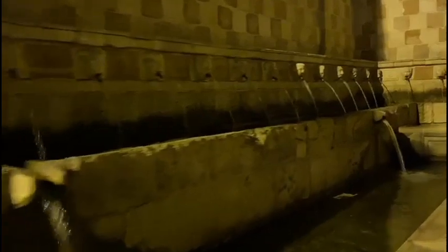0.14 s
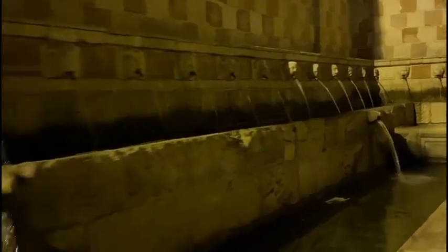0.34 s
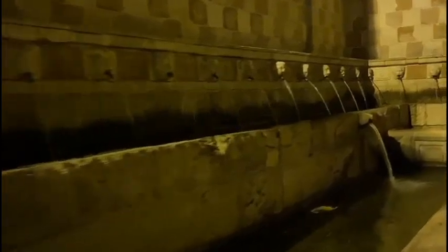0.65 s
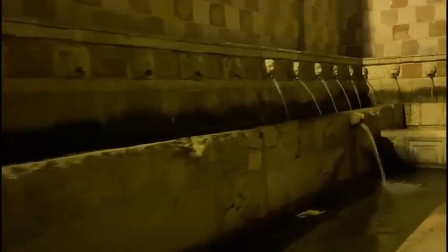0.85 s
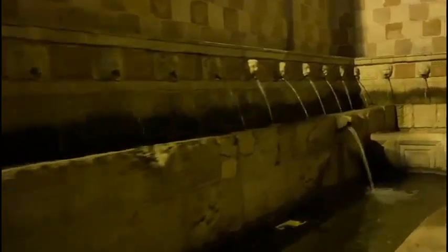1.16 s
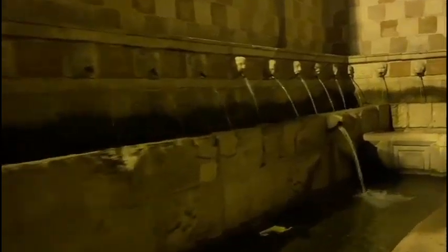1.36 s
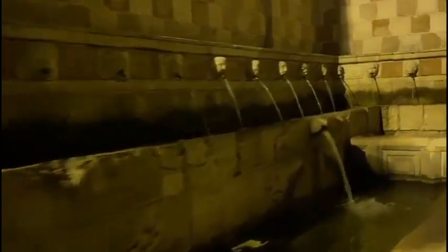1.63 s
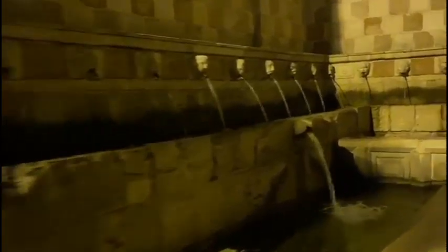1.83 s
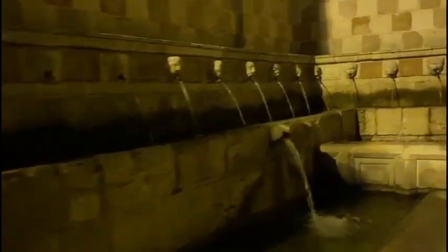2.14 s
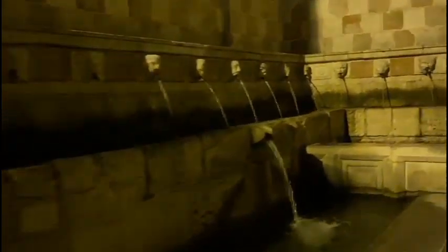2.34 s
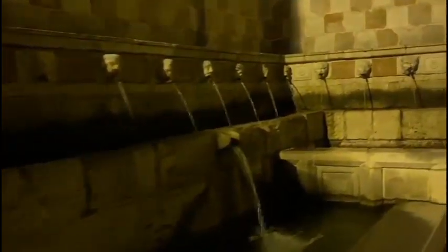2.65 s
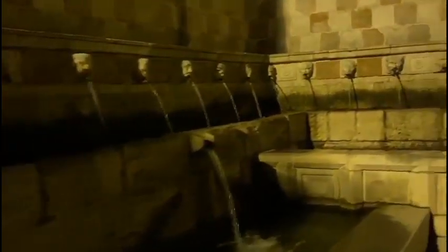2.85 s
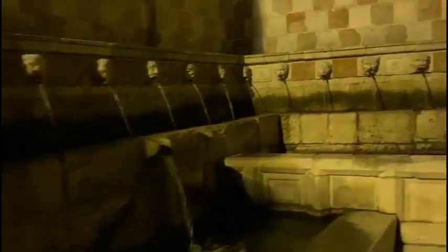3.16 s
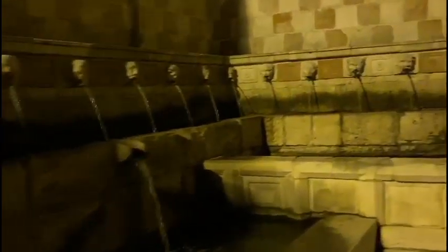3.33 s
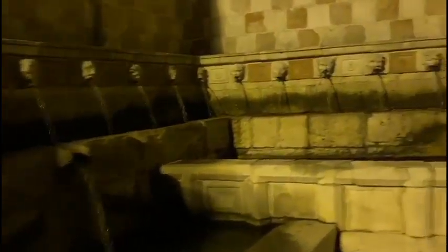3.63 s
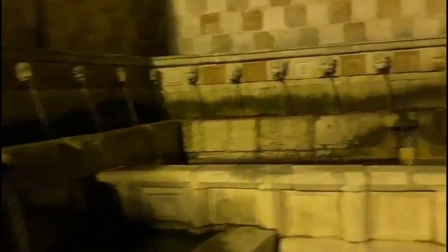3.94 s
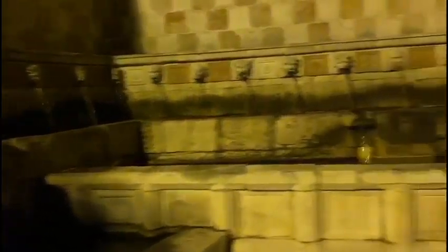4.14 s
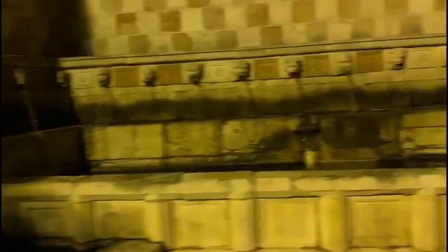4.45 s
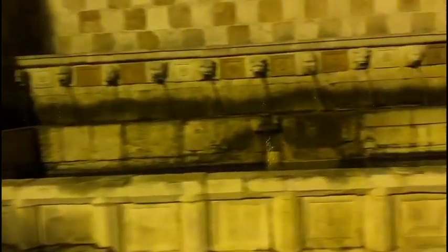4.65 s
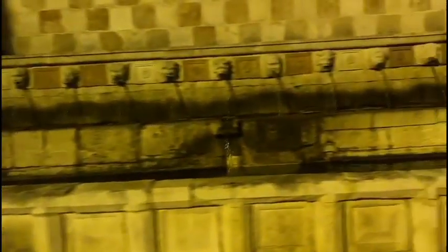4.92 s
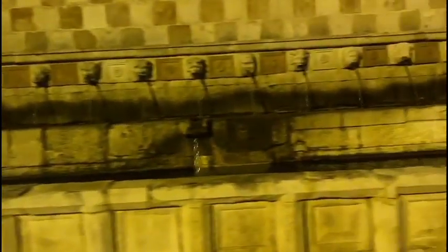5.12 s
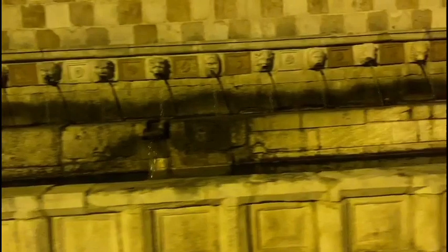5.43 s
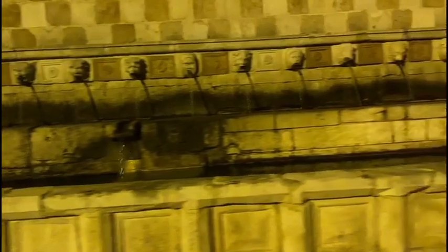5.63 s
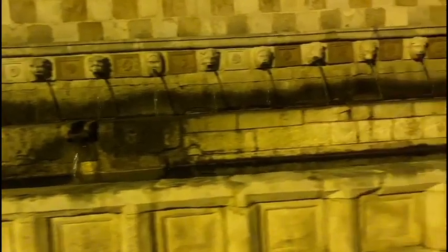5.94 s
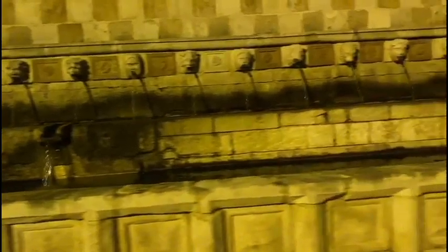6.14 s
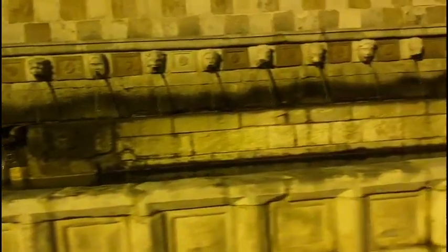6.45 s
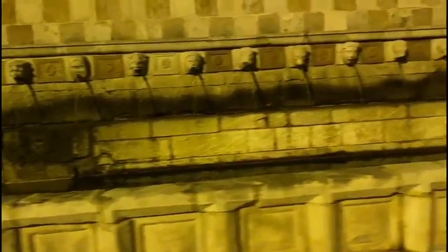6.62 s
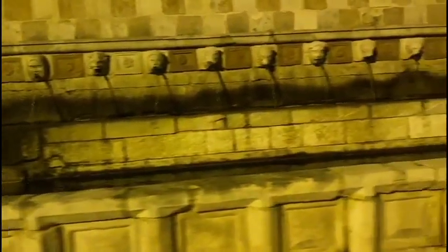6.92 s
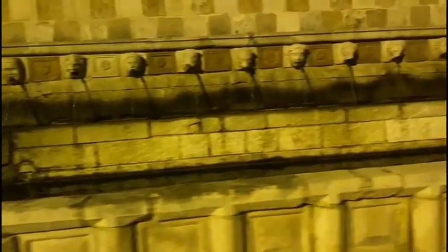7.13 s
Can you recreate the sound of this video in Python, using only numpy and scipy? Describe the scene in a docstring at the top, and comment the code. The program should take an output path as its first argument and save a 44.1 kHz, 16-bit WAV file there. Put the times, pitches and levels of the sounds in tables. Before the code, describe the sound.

Water splashes and gurgles from a row of spouts in a walled corner, with soft wind thumps and a faint distant town hum.

```python
"""A bright wash of water, as a row of spouts pours into a fountain's stone troughs in a walled corner.
Tiny drops merge into hiss, trapped bubbles ring, and now and then a lump of water lands with a splat.
The walls echo the drops, and a town murmurs far away. A light wind rumbles and thumps on the
microphone, then dies down; the stereo image shifts as it turns from the near jets to the far wall."""
import sys
import numpy as np
from scipy import signal
from scipy.fft import rfft, irfft
from scipy.io import wavfile
from scipy.ndimage import uniform_filter1d

SR = 44100
rng = np.random.default_rng(int(sys.argv[2]) if len(sys.argv) > 2 else 0)


def unload_audio(sound):
    """Save the sound as a 16-bit wav file, at the path given as the first command line argument."""
    columns = np.transpose(np.atleast_2d(sound))
    # keep every value between -1 and 1, then stretch to whole-number steps
    steps = np.round(np.clip(columns, -1, 1) * 32767)
    wavfile.write(sys.argv[1], SR, steps.astype(np.int16))


N = 321048

# Fader rides on the water, each taken relative to its own average: time_s, splash_db, spray_db
WATER_RIDES = [(0, -38, -41), (0.85, -37, -40.5), (1.45, -38.5, -41), (2.2, -38, -42), (3.05, -38, -41.5),
               (3.9, -39.5, -42.5), (4.4, -39, -41.5), (5.6, -40.5, -43.5), (7.28, -41, -43.5)]
# EQ of the falling water: frequency_hz, gain_db
WATER_EQ = [(100, -15), (250, -3), (400, -7), (570, -6), (760, -5), (1000, -5), (1400, -5), (1750, -7),
            (2800, -9.5), (3400, -10.5), (4400, -15), (5200, -17), (6700, -20), (7600, -20), (8400, -20),
            (10500, -20), (11500, -22.5)]
# Gurgle of two single jets as the microphone passes, before the EQ: time_s, shallow_db, deep_db
JET_RIDES = [(0, -19, -12.5), (.9, -11, -16), (1.7, -12, -19), (2.4, -23, -16.5), (3.6, -18, -13),
             (4.6, -16, -17), (5.8, -17, -20.5), (7.28, -15, -29)]
# Reverb time of the stone corner: frequency_hz, t60_s
WALL_DECAY = [(200, 0.47), (1500, 0.77), (5000, 1), (11000, 0.066)]
# Stereo image facing along the spouts: frequency_hz, likeness (0-1), left_lead_rad
IMAGE_SPOUTS = [(150, 0.83, -0.34), (300, 0.62, 0.08), (450, 0.45, 1.24), (700, 0.36, 2.13),
                (1400, 0.28, 3.05), (1650, 0.12, 4.65), (2000, 0.44, 6.11), (2400, 0.67, 6.44),
                (2900, 0.54, 7.06), (3500, 0.31, 7.49), (3950, 0.16, 7.12), (4800, 0.55, 6.8),
                (5450, 0.55, 6.58), (5850, 0.17, 5.57), (6500, 0.76, 6.21), (7200, 0.69, 6.11),
                (7600, 0.23, 5.01), (8050, 0.95, 3.11), (8400, 0.99, 3.14), (8700, 0.96, 3.07),
                (9200, 0.69, 2.44), (9650, 0.54, 1.26), (10100, 0.9, 0.1), (10400, 1, 0)]
# Stereo image facing the far wall: frequency_hz, likeness (0-1), left_lead_rad
IMAGE_WALL = [(150, 0.78, -0.09), (300, 0.46, 0.09), (450, 0.27, 1.64), (700, 0.33, 2.46), (900, 0.55, 2.7),
              (1330, 0.62, 3.1), (1650, 0.3, 3.61), (2000, 0.19, 5.56), (2400, 0.52, 6.38),
              (2900, 0.51, 6.88), (3500, 0.29, 7.59), (3950, 0.2, 7.79), (4800, 0.44, 6.65),
              (5450, 0.53, 6.59), (5850, 0.09, 4.04), (6500, 0.71, 6.21), (7200, 0.74, 6.14),
              (7600, 0.17, 4.81), (8050, 0.95, 3.11), (8400, 0.99, 3.14), (8700, 0.96, 3.05),
              (9200, 0.68, 2.34), (9650, 0.53, 1.25), (10100, 0.87, 0.2), (10400, 1, 0)]
# The microphone's turn toward the wall: time_s, share_turned (0-1)
MIC_TURN = [(4.1, 0.046), (5.7, 1)]
# Balance of the water: frequency_hz, left_over_right_db
BALANCE = [(150, 0), (350, .7), (620, 2.8), (1200, 2), (2600, 2.2), (3800, 3.5), (5800, 2.7), (6600, .5),
           (7700, 1.2), (8200, 0)]
# EQ of the distant town: frequency_hz, gain_db
TOWN_EQ = [(20, -32), (60, -26), (110, -4.5), (160, 1.5), (210, -6), (330, -14), (450, -13), (1000, -62),
           (4000, -70)]
# EQ of the wind rumble: frequency_hz, gain_db
WIND_EQ = [(15, -29), (30, -20), (50, -1), (65, 1.5), (100, -3), (160, -10.5), (260, -23.5), (600, -70),
           (2000, -90)]
# The breeze between gusts, with two lulls: time_s, level_db
BREEZE_RIDE = [(0, -34.5), (.66, -37.5), (1.15, -33), (2.8, -32.5), (2.95, -45.5), (3.15, -35.5),
               (4.1, -38), (5.8, -44.5), (6.15, -58), (6.65, -42.5), (7.28, -47)]
# Gusts brushing the microphone: start_s, length_s, level_db
GUST_CUES = [(0.213, 0.1, -29.5), (0.371, 0.056, -29), (0.468, 0.13, -29.5), (0.705, 0.086, -31.5),
             (0.86, 0.074, -30.5), (0.944, 0.054, -25), (1.03, 0.05, -21), (1.233, 0.05, -31.5),
             (1.646, 0.26, -29.5), (1.957, 0.15, -36), (2.094, 0.39, -33), (2.482, 0.11, -32),
             (3.043, 0.16, -35), (3.47, 0.23, -33), (3.737, 0.13, -33), (3.98, 0.16, -29),
             (4.192, 0.16, -37.5), (4.546, 0.13, -31.5), (4.771, 0.13, -34), (5.184, 0.11, -34),
             (5.834, 0.15, -39), (6.483, 0.052, -40)]
# Lumps of water slapping the surface: start_s, relative_level_db, centre_hz, width_octaves, attack_s
SPLAT_CUES = [(.059, 4, 4000, .3, .0014), (.107, 12.5, 2750, .2, .0017), (.196, 8, 3100, .45, .0012),
              (0.243, 11, 6500, .35, .002), (0.405, 12.5, 6500, 0.33, .0014), (.707, 8, 10800, .2, .002),
              (0.791, 11, 10400, .2, .0018), (.800, 13, 10400, .2, 0.0026), (0.802, 14, 4200, 0.21, .002),
              (.925, 8, 4500, .2, .005), (0.967, 7, 4600, 0.18, 0.0049), (.986, 15, 4770, .1, 0.0027),
              (1.278, 8, 10000, .3, .002), (1.346, 12.5, 10500, .2, .0023), (1.76, 15, 9100, 0.41, .0017),
              (2.21, 11, 4650, .15, .0022), (2.481, 8, 2700, .4, 0.0019), (2.493, 9, 3000, 0.78, 0.0012),
              (2.558, 9, 10500, .2, .001), (2.567, 7, 6500, .25, .0015), (2.755, 9.5, 3400, 1, .0022),
              (2.78, 9, 3950, .12, .002), (3.259, 9, 10000, .2, .0015), (3.751, 15, 5800, 0.17, .0012),
              (4.022, 11, 6000, 0.33, .0013), (4.192, 6, 3000, .35, .0014), (4.22, 4, 3200, .35, 0.0013),
              (4.4485, 12, 10400, .2, .0011), (4.666, 13, 10400, .25, .0008),
              (4.667, 8, 2100, 0.37, 0.0015), (5.499, 10.5, 2400, 0.5, .0017),
              (5.608, 11, 5500, .15, .0016), (5.719, 12, 10300, .2, .0013), (5.843, 12, 6500, .3, .001),
              (6.144, 13, 2400, .25, .0014), (6.199, 7, 10400, .2, .0012), (6.2485, 13, 8000, .45, .0012),
              (7.0612, 16, 9200, 0.4, .0007), (7.181, 8, 6000, .25, .0016)]
# Single eddies thumping the microphone: start_s, relative_peak_db, decay_s
BUFFET_CUES = [(0.243, -25, 0.0055), (0.263, -25, 0.0022), (0.495, -22.5, .0035), (0.558, -25, 0.0017),
               (0.712, -22, 0.0022), (0.854, -27, 0.0038), (.95, -17, 0.0012), (1.023, -19.5, 0.0045),
               (1.063, -21, 0.0021), (1.276, -29, .0018), (1.794, -18, 0.00097), (1.861, -24, 0.0016),
               (2.111, -13.5, 0.0026), (2.187, -25, 0.0044), (2.229, -20, 0.0027), (2.261, -24, 0.002),
               (2.29, -20, 0.0021), (2.342, -16, 0.0032), (2.418, -16.5, 0.0015), (2.506, -23, 0.0017),
               (2.556, -21.5, 0.0017), (2.728, -21, 0.0038), (3.297, -22.5, 0.0015), (3.478, -22.5, 0.0046),
               (3.623, -20, 0.0012), (3.982, -21.5, 0.0015), (4.007, -27, 0.0032), (4.807, -29, 0.0032),
               (5.198, -26, 0.0015)]
# Single large bubbles: start_s, relative_level_db, pitch_hz, decay_s
PLINK_CUES = [(.409, 2.5, 984, 0.0078), (.472, -2, 2420, .006), (.882, -1, 860, 0.014),
              (1.566, 3, 885, 0.0098), (1.642, 2, 2970, .005), (1.7455, 7, 1120, 0.005),
              (2.254, 2, 2826, .006), (2.491, 2, 1650, 0.0065), (2.756, 4, 1900, .007),
              (3.639, -2, 453, .008), (3.901, -5, 1660, 0.0069), (4.19, 0, 3020, .006),
              (4.215, 1, 2555, .006), (4.625, -1, 1040, .006), (4.667, 7, 2020, 0.0043),
              (5.5, 0, 2730, .007), (6.101, -16, 910, .012), (6.132, -13, 1180, 0.0053),
              (6.136, -2, 687, .012), (6.147, 2, 2219, 0.011), (6.502, 3, 960, 0.0088),
              (7.025, -6, 1380, .007)]


def amp(db):
    """Decibels to gain."""
    return 10 ** (np.asarray(db) / 20)


def unit_rms(x):
    """Scales to rms 1."""
    return x / np.sqrt(np.mean(x ** 2) + 1e-20)


def at_hz(rows, hz, column=1):
    """Reads a curve on a log-frequency axis."""
    columns = np.transpose(rows)
    return np.interp(np.log(hz + 1), np.log(columns[0] + 1), columns[column])


def at_time(rows, t, column=1):
    """Reads an automation curve, with straight ramps between its points."""
    columns = np.transpose(rows)
    return np.interp(t, columns[0], columns[column])


def bell(hz, centre_hz, octaves):
    """A bell-shaped band, 1 at its centre."""
    return np.exp(-.5 * (np.log2((hz + 1) / centre_hz) / octaves) ** 2)


def add(mix, start_s, sound):
    """Drops a sound into the mix."""
    part = mix[..., max(round(start_s * SR), 0):][..., :sound.shape[-1]]
    part += sound[..., :part.shape[-1]]


def spectra(x, size=512):
    """Short-time spectra: Hz, s, channels x bins x frames."""
    return signal.stft(x, SR, nperseg=size, noverlap=size - size // 4)


def waveform(z, size=512):
    """Short-time spectra back to sound."""
    return signal.istft(z, SR, nperseg=size, noverlap=size - size // 4)[1][..., :N]


def patches(z, width_hz, length_s):
    """Smooth random modulation over the bins and frames of z, rms 1."""
    bins, frames = shape = z.shape[1:]
    across = np.fft.fftfreq(bins, SR / 2 / bins)[:, None] * width_hz
    along = np.fft.rfftfreq(frames, N / SR / frames) * length_s
    smooth = np.exp(-across ** 2) / np.sqrt(1 + (np.pi * along) ** 2)
    return unit_rms(np.fft.irfft2(np.fft.rfft2(rng.standard_normal(shape)) * smooth, shape))


def noise_pair(eq):
    """Two unrelated noises through the same EQ."""
    colour = amp(at_hz(eq, np.fft.rfftfreq(N, 1 / SR)))
    return unit_rms(irfft(rfft(rng.standard_normal((2, N))) * colour, N))


def wash(patchy_db=1.5, surge_db=0.62, spray_db=1, churn_db=0.7):
    """Countless tiny drops merge into a hiss that surges as jets break up and churns where they plunge."""
    hz, _, z = spectra(rng.standard_normal((2, N)))
    patchy = patches(z, width_hz=650, length_s=0.036)
    surge = patches(z, width_hz=6200, length_s=0.015)
    treble = np.minimum(hz / 8000, 1)[:, None]
    mids = bell(hz, centre_hz=1300, octaves=0.91)[:, None]
    spray = patches(z, width_hz=8100, length_s=0.023) * treble  # fine spray comes in waves
    churn = patches(z, width_hz=150, length_s=0.013) * mids  # clouds of bubbles come and go
    flutter_db = patchy_db * patchy + surge_db * surge + spray_db * spray + churn_db * churn
    return unit_rms(waveform(z * amp(flutter_db)))


def bubble_ring(t, hz, age, rise):
    """Trapped air rings and dies, bending up as it nears the surface; age counts decay times."""
    return np.exp(-age) * np.sin(2 * np.pi * hz * t * (1 + rise * np.minimum(age, 2)))


def bubbles(count, low_hz, high_hz, cycles, rise, spread_db, size):
    """A swarm of bubbles, each ringing for a few cycles at its own time, pitch and place."""
    when, pitch, strength, damping, place = rng.random((count, 5)).T
    hz = (low_hz * (high_hz / low_hz) ** pitch)[:, None]
    t = np.arange(size) / SR
    age = hz * t / (cycles * (.5 + damping[:, None]))
    level_db = spread_db * np.minimum(-np.log(1 - strength), 4)
    rings = hz * amp(level_db)[:, None] * bubble_ring(t, hz, age, rise)
    samples = (when * N).astype(int)[:, None] + np.arange(size)
    pans = np.cos(2 * np.pi * place), np.sin(2 * np.pi * place)
    swarm = [np.bincount(samples.ravel(), (rings * pan[:, None]).ravel(), N)[:N] for pan in pans]
    return unit_rms(np.array(swarm))


def droplets(per_s=600, spread_db=3.5, low_cut_hz=4500):
    """Thrown drops tick on the water and the wet stone."""
    hits = rng.random((2, N)) < per_s / SR
    ticks = hits * amp(spread_db * np.minimum(rng.exponential(1, (2, N)), 4))
    low_cut = signal.butter(2, low_cut_hz, "highpass", fs=SR, output="sos")
    return unit_rms(signal.sosfilt(low_cut, ticks))


def wall_echo(x, count=1500):
    """The stone corner answers with sparse echoes; the top end dies first."""
    taps = np.zeros((2, SR))
    delays = rng.integers(SR // 200, SR, (2, count))
    np.put_along_axis(taps, delays, rng.choice([-1., 1.], (2, count)), 1)
    hz, t, z = spectra(taps)
    tail = waveform(z * np.exp(-np.log(1000) * t / at_hz(WALL_DECAY, hz)[:, None]))
    return signal.fftconvolve(x, tail / np.linalg.norm(tail[0]), axes=1)[:, :N]


def pouring():
    """The jets hit the troughs: a bed of wash, with bubbles and drops that echo off the walls."""
    t = np.arange(N) / SR
    fizz = bubbles(9000, low_hz=1219, high_hz=10420, cycles=4.8, rise=0.016, spread_db=-0.5, size=384)
    gurgle = bubbles(1100, low_hz=521.6, high_hz=2114, cycles=7.2, rise=0.03, spread_db=1.5, size=2048)
    shallow = bubbles(700, low_hz=759.4, high_hz=1120, cycles=9.2, rise=0.021, spread_db=-1.5, size=1536)
    deep = bubbles(400, low_hz=454, high_hz=673, cycles=8.6, rise=0.035, spread_db=2, size=2560)
    trickle = bubbles(700, low_hz=480, high_hz=2900, cycles=18, rise=0.015, spread_db=0.3, size=3584)
    jets = shallow * amp(at_time(JET_RIDES, t)) + deep * amp(at_time(JET_RIDES, t, column=2))
    swarms = amp(-8) * fizz + amp(-16) * gurgle + amp(-12) * trickle + jets
    detail = swarms + amp(-17) * droplets() + amp(2.5) * splats() + amp(0.5) * plinks()
    return amp(4.5) * wash() + detail + amp(-8.5) * wall_echo(detail)


def stereo_image(z, hz, t):
    """Two sound fields reach the microphone's two ports; likeness and lag change as it turns."""
    spouts, wall = (at_hz(image, hz) * np.exp(1j * at_hz(image, hz, column=2))
                    for image in (IMAGE_SPOUTS, IMAGE_WALL))
    turned = at_time(MIC_TURN, t)
    coherence = (1 - turned) * spouts[:, None] + turned * wall[:, None]
    likeness = np.minimum(abs(coherence), 1)
    mid, side = z[0] * np.sqrt((1 + likeness) / 2), z[1] * np.sqrt((1 - likeness) / 2)
    lean = amp(at_hz(BALANCE, hz) / 2)[:, None]
    right_lag = np.exp(-1j * np.angle(coherence))
    return np.array([(mid + side) * lean, (mid - side) * right_lag / lean])


def fountain(gain_db=-29.5, ripple_db=1.04, gurgle_follows=0.81):
    """The pouring, coloured by the troughs and by where the microphone points."""
    hz, t, z = spectra(pouring())
    ripple = patches(z, width_hz=110, length_s=0.34)  # near reflections drift as the microphone moves
    z = z * amp(at_hz(WATER_EQ, hz)[:, None] + ripple_db * ripple)
    z = z / np.std(waveform(z))
    splash_db, spray_db = at_time(WATER_RIDES, t), at_time(WATER_RIDES, t, column=2)
    rides_db = np.array([gurgle_follows * splash_db, splash_db, spray_db])
    rides_db -= rides_db.mean(1, keepdims=True)
    centres_hz = [935, 3180, 8700]  # gurgle, splash, spray
    bands = np.array([np.interp(np.log(hz + 1), np.log(centres_hz), row) for row in np.eye(3)])
    return amp(gain_db) * waveform(stereo_image(z * amp(bands.T @ rides_db), hz, t))


def town(level_db=-41.5, side_db=-6):
    """The far-off town lays a dull, even murmur under the water."""
    mid, side = noise_pair(TOWN_EQ)
    return amp(level_db) * unit_rms(mid + amp(side_db) * np.array([side, -side]))


def wind_strength(t, attack_s=0.028, release_s=0.02):
    """Each gust swells, holds and dies away, adding its power to the breeze."""
    power = amp(at_time(BREEZE_RIDE, t)) ** 2
    for start_s, length_s, level_db in GUST_CUES:
        swell = np.clip((t - start_s) / attack_s + .5, 0, 1)
        fade = np.clip((start_s + length_s - t) / release_s + .5, 0, 1)
        power += (amp(level_db) * swell * fade) ** 2
    return np.sqrt(power)


def wind(side_db=-10.5):
    """Lumpy pressure rumbles on the microphone, nearly alike left and right."""
    mid, side = noise_pair(WIND_EQ)
    mid = mid / np.sqrt(uniform_filter1d(mid ** 2, size=6000) + 1e-9)  # iron out the noise's own swells
    rumble = mid + amp(side_db) * np.array([side, -side])
    return rumble * wind_strength(np.arange(N) / SR)


def splats(tail_db=-13, tail_s=.012, size=4096):
    """Each lump of water bursts with a crisp puff, and a tail of fine spray falls back."""
    out, t, hz = np.zeros((2, N)), np.arange(size) / SR, np.fft.rfftfreq(size, 1 / SR)
    for start_s, level_db, centre_hz, octaves, attack_s in SPLAT_CUES:
        spray = irfft(rfft(rng.standard_normal((2, size))) * bell(hz, centre_hz, octaves))
        burst = t / attack_s * np.exp(1 - t / attack_s)
        tail = amp(tail_db) * np.minimum(t / attack_s, 1) * np.exp(-t / tail_s)
        add(out, start_s, amp(level_db) * spray * (burst + tail))
    return out


def buffets(trim_db=0.3, low_cut_hz=52, size=6000):
    """An eddy is one tug of suction; the microphone's low cut makes it a thump that falls in pitch."""
    out, t = np.zeros(N), np.arange(size) / SR
    low_cut = signal.butter(8, low_cut_hz, "highpass", fs=SR, output="sos")
    for start_s, peak_db, decay_s in BUFFET_CUES:
        suction = -(t / decay_s) ** 2 * np.exp(-t / decay_s)
        thump = signal.sosfilt(low_cut, suction)
        add(out, start_s, amp(peak_db + trim_db) * thump / abs(thump).max())
    return out


def plinks(rise=0.024, size=4096):
    """A large bubble rings out of the swarm with a clear, slightly rising note."""
    out, t = np.zeros(N), np.arange(size) / SR
    for start_s, level_db, pitch_hz, decay_s in PLINK_CUES:
        add(out, start_s, amp(level_db) * bubble_ring(t, pitch_hz, t / decay_s, rise))
    return out


def scene():
    """Water up front, town behind, wind on the microphone."""
    return fountain() + town() + wind() + buffets()


def record(dry, high_cut_hz=11640):
    """A steep high cut takes the air off the whole mix."""
    high_cut = signal.firwin(511, high_cut_hz, window=("kaiser", 9), fs=SR)
    return signal.oaconvolve(dry, high_cut[None], "same")


dry = scene()
out = record(dry)
unload_audio(out)
```